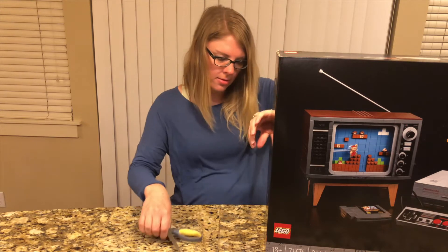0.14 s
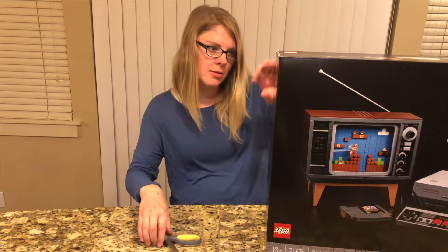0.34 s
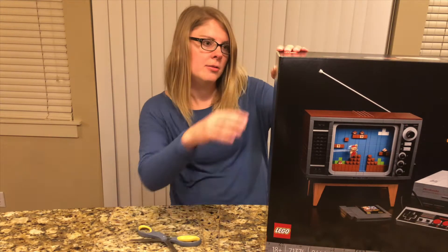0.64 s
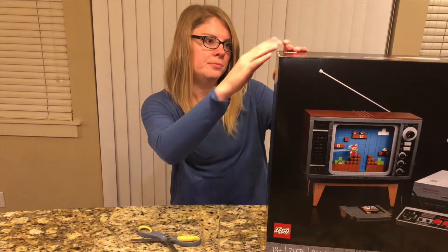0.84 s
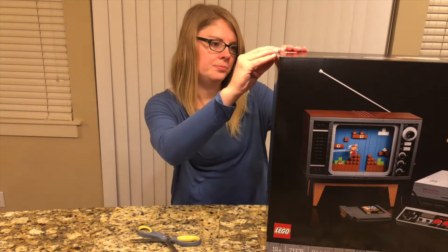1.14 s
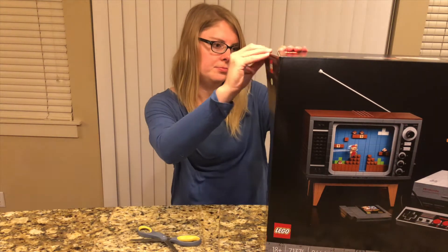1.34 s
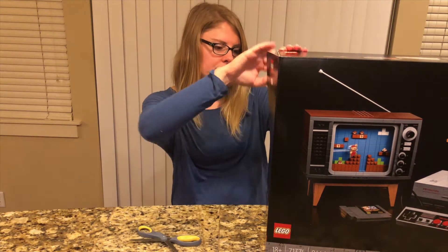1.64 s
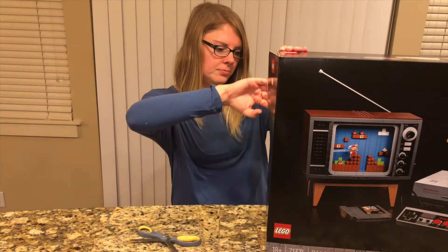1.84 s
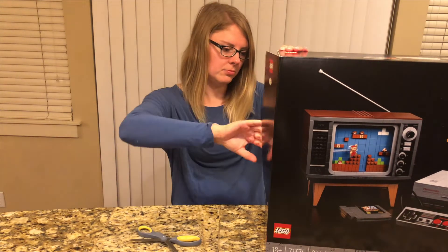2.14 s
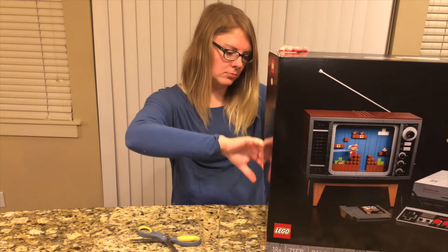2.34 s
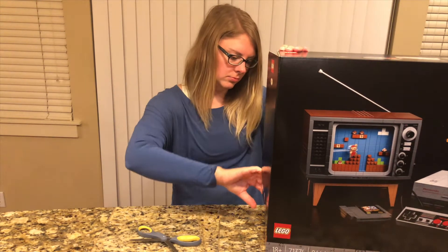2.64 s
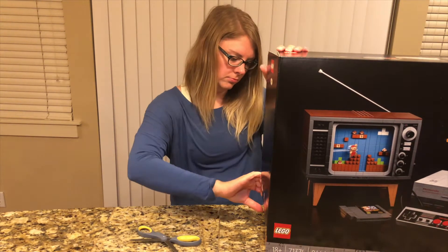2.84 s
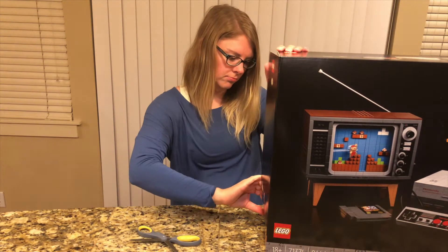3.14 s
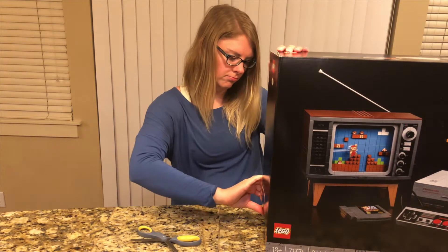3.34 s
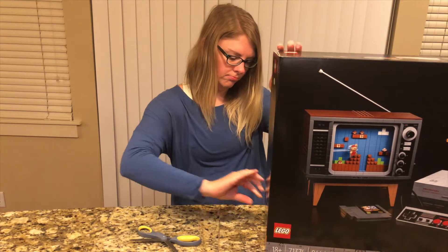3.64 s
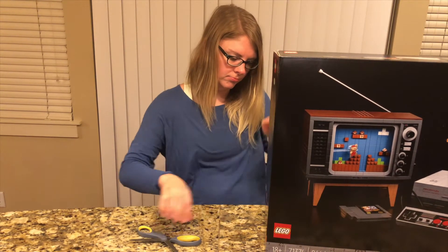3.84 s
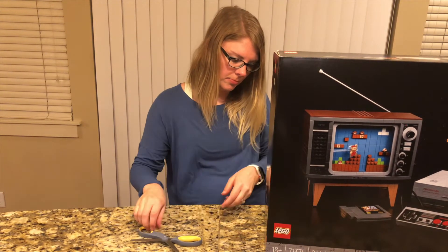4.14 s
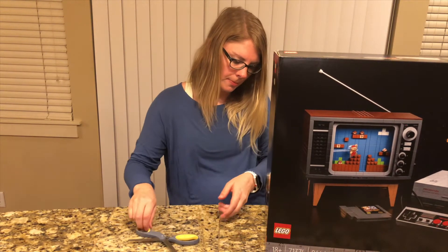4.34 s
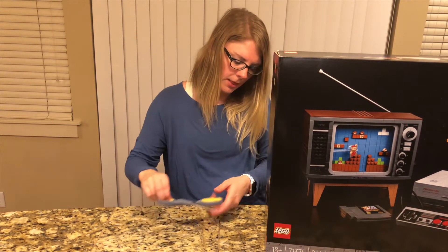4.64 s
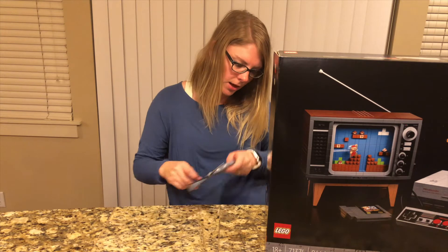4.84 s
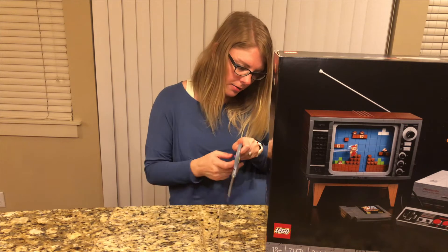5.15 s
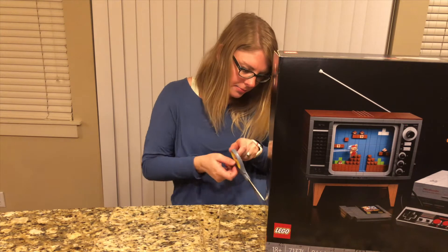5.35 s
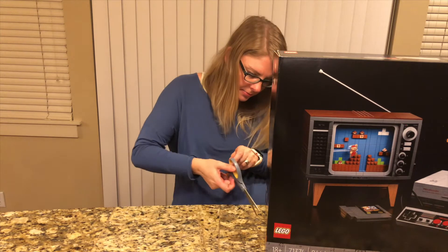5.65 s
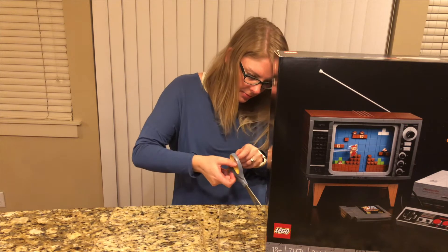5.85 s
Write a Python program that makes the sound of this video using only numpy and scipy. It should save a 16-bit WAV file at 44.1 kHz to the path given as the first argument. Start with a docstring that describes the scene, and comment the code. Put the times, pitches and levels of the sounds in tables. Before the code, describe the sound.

A low, slightly unsteady appliance hum with soft fan noise runs throughout a small, mildly reverberant kitchen. At 0.15 s scissors touch a stone counter, then clatter in a dense cluster from 0.24 to 0.4 s, hard clicks with ringing plastic handles and bright blades. Faint scuffs follow until 1 s. At 1.26 s the stiff edge of a big cardboard box pops; fainter flicks come around 1.45 s with a fingertip rub, and the loudest, boomy pop hits at 1.9 s. A palm hisses down the side from 2.15 to 2.6 s. Between 2.7 and 3.45 s tape lets go in small dry ticks and crackles. A short brush and soft thud come at 3.5 to 3.6 s. A gritty scrape of scissors on stone swells toward 4 s, with handle rattles and clicks from 4.05 to 4.4 s. A barely audible click at 4.77 s leaves just the hum.

```python
"""Scissors and a taped box

Scissors clatter onto a stone kitchen counter: damped noise bands plus ringing handles and blades.
A hand pops the edge of a big cardboard box, twice loudly and a few times faintly, slides down its side
(shaped noise) and picks at crackling tape, then drags the scissors off the counter and clicks them.
An appliance hums throughout (motor tones and fan noise); a diffuse room tail answers every other sound."""
import sys
import numpy as np
from scipy import signal
from scipy.fft import rfft, irfft, next_fast_len
from scipy.io import wavfile
from scipy.ndimage import map_coordinates

SR = 44100
rng = np.random.default_rng(int(sys.argv[2]) if len(sys.argv) > 2 else 0)


def wav_record(signal):
    """Record a signal, one row per channel, as 16-bit PCM in the file named by sys.argv[1]."""
    frames = np.transpose(np.atleast_2d(signal))
    bounded = np.clip(frames, -1, 1)
    # unit amplitude maps onto the largest positive 16-bit level
    quanta = np.round(bounded * 32767).astype(np.int16)
    wavfile.write(sys.argv[1], SR, quanta)


N = 264159
TIME = np.arange(N) / SR
AGE = TIME[:SR // 2]  # time since a blow, s

# plastic scissor handles, ringing modes: mode_hz, relative_level_db, t60_s
HANDLES = [(556, -9, .25), (689, 0, .24), (727, -8, .12), (845, -9, .15), (961, -6, .2), (1130, -7, .2),
           (1250, -3, .1), (1410, -4, .1), (1502, -4, .2), (1633, -3, .2), (2340, -6, .1)]


def amp(db):
    """Decibels to gain."""
    return 10 ** (np.asarray(db) / 20)


def unit(x):
    """Scale to rms 1."""
    return x / np.sqrt(np.mean(x ** 2) + 1e-20)


def blow(x):
    """Scale to the energy of 10 ms at rms 1."""
    return x * np.sqrt(SR / 100 / (np.sum(x ** 2) + 1e-20))


def along(points, hz):
    """(Hz, value) points read on a log frequency axis."""
    f, v = np.transpose(points)
    return np.interp(np.log(hz + 1), np.log(f + 1), v)


def wobble(knots_per_s):
    """A smooth random curve through normally distributed knots."""
    knots = rng.standard_normal(int(N * knots_per_s / SR) + 4)
    return map_coordinates(knots, [TIME * knots_per_s])


def filtered(x, gain):
    """x with a gain that depends on frequency."""
    m = next_fast_len(len(x) + 8192)
    spectrum = rfft(x, m) * gain(np.fft.rfftfreq(m, 1 / SR))
    return irfft(spectrum, m)[:len(x)]


def noise(colour, grain_db=0):
    """Coloured noise of rms 1; grain clumps it into tiny catches."""
    source = rng.standard_normal(N) * amp(grain_db * wobble(900))
    return unit(filtered(source, lambda hz: amp(along(colour, hz))))


def stroke(start_s, rise_s, length_s, level_db, sag_db_per_s, release_db_per_s):
    """Gain of a rub: it swells, sags as pressure eases, then fades faster after its length."""
    t = np.maximum(TIME - start_s, 0)
    swell = np.sin(np.pi / 2 * np.minimum(t / rise_s, 1)) ** 2
    release_db = release_db_per_s * np.maximum(t - length_s, 0)
    return swell * amp(level_db - sag_db_per_s * t - release_db)


def add(track, start_s, sound):
    """Mix a sound into the track."""
    part = track[round(start_s * SR):][:len(sound)]
    part += sound[:len(part)]


def flurry(spans, rate_per_s, scatter_db):
    """(start_s, level_db) of small contacts that come unevenly during each span."""
    contacts = []
    for span_s, length_s, level_db in spans:
        late, strength = rng.random(20), rng.standard_normal(20)
        after_s = (np.arange(20) + late / 2) / rate_per_s
        for s, k in zip(after_s, strength):
            if s < length_s:
                contacts.append((span_s + s, level_db + scatter_db * k))
    return contacts


def crack(material, tilt_db_per_octave):
    """Damped noise bands of a material. Row 0: direct sound; row 1: even average that feeds the room."""
    t = AGE[:SR // 6]
    white = rfft(rng.standard_normal(len(t)))
    f = np.fft.rfftfreq(len(t), 1 / SR)
    centres_hz = [row[0] for row in material]
    out = np.zeros((2, len(t)))
    for share, (hz, level_db, t60_s) in zip(np.eye(len(material)), material):
        # power response: crossfades between neighbours, rolls off below the lowest band
        window = along(np.c_[centres_hz, share], f) * np.minimum(f / centres_hz[0], 1) ** 2
        band = irfft(white * np.sqrt(window), len(t))
        band *= amp(-60 * t / t60_s) * (1 - np.exp(-t * hz / 2.7))  # low bands start later
        even = np.roll(irfft(window, len(t)), SR // 400)
        even *= t < t[-1] / 2
        tilt_db = tilt_db_per_octave * np.log2(max(hz, 700) / 2000)
        out += amp(level_db + tilt_db) * np.array([blow(band), amp(1.0) * blow(even)])
    return np.pad(out, ((0, 0), (0, len(AGE) - len(t))))


def ring(modes):
    """Decaying sine modes, struck at new strengths and phases every time."""
    hz, level_db, t60_s = np.transpose(modes)[:, :, None]
    strength, phase = rng.standard_normal((2, len(modes), 1))
    decay = amp(level_db + 2 * strength - 60 * AGE / t60_s)
    waves = decay * np.sin(2 * np.pi * (hz * AGE + phase))
    return blow(np.sum(waves * (1 - np.exp(-AGE * hz)), axis=0))


def thud(hz):
    """A soft low push with hardly any ring: direct sound, and the weaker share that stirs the room."""
    push = blow(np.sin(2 * np.pi * hz * AGE) * AGE * np.exp(-AGE * hz / 0.95))
    return np.array([push, amp(-3.5) * push])


def in_room(x):
    """A sound plus its diffuse tail: noise that builds up, then decays fastest in the top treble."""
    # room tail: band_hz, t60_s, level_db
    room = np.array([(103.3, .5, -3.5), (403, 0.58, 0.5), (1500, 0.65, -3.5), (4900, 0.69, -4.5),
                     (9060, 0.46, -6.5), (15200, 0.32, -10)])
    direct, radiated = np.broadcast_to(x, (2, x.shape[-1]))
    hz, t, z = signal.stft(rng.standard_normal(SR * 3 // 4), SR, nperseg=256)
    t60_s = along(room[:, :2], hz)[:, None]
    level_db = along(room[:, ::2], hz)[:, None]
    decay = amp(level_db - 60 * t / t60_s) * np.sqrt(np.log(1e6) / (t60_s * SR))
    tail = signal.istft(z * decay, SR, nperseg=256)[1]
    build_up = 1 - np.exp(-(TIME[:len(tail)] / 0.0026) ** 2)
    out = signal.fftconvolve(radiated, tail * build_up)
    add(out, 0, direct)
    return out


def appliance():
    """Motor tones, slightly unsteady in level and phase, over the rush of a fan."""
    # motor tones: tone_hz, rms_level_db, unsteadiness_db
    hum = [(59.4, -60.5, 1), (99.5, -60, 1.5), (199.3, -47, .6), (248, -68, 3), (316, -67.5, 3),
           (357, -68, 3), (415, -65, 3), (597, -77, 2), (1723, -82, 1.5)]
    # fan noise colour: frequency_hz, relative_level_db_per_hz
    air = [(20, -28.5), (55, -9.5), (80, -9), (130, -6.5), (200, 1.5), (280, -0.5), (400, -1), (500, -10.5),
           (800, -14.5), (1500, -21.5), (3000, -28), (8000, -31.5), (16000, -39.5)]
    tones = np.zeros(N)
    for hz, rms_db, sway_db in hum:
        level = amp(rms_db + sway_db * wobble(4.0))
        tones += level * np.sin(2 * np.pi * hz * TIME + 0.31 * sway_db * wobble(7))
    return np.sqrt(2) * tones + amp(-54.0) * noise(air)


def scissors():
    """Contacts click on stone, clack at the struck spot, ring handles and blades; jolts rattle the halves."""
    # strikes on the stone, or closing (level before trim):
    # start_s, level_db, tilt_db_per_octave, clack_hz, handle_ring_db, blade_ring_db
    strikes = [(.1527, -43, 3.5, 1650, -0.5, -7), (.2424, -29.5, 1, 1480, -4, -15),
               (.2681, -24, 3, 1200, -1.5, -24), (.3, -31.5, 7.5, 4800, 3.5, 3),
               (.3095, -26, -4, 850, 4, 3), (.3158, -34, 8, 3730, -21, 9),
               (.3638, -28.5, -3, 1485, -2, -12), (.368, -27.5, 4.5, 2170, -2, -13),
               (.3795, -29.5, -5, 720, -2, -1.5), (0.383, -30, 2.5, 1093, -2.5, -4),
               (0.9168, -66.5, 7, 3600, -18, -17.5), (4.051, -45.5, 1, 2370, 3, -11),
               (4.0655, -38, -1, 2060, 6.5, -17), (4.0805, -39, -1.5, 2400, 2.5, -16),
               (4.1863, -41, -8.5, 2030, 5, -32), (4.3511, -44.5, -6, 2360, -5, -26),
               (4.4036, -48.5, 7.5, 8200, 2, 6.5), (4.7732, -68, 2, 4110, -14, -13)]
    # loose halves rattling after a jolt: start_s, length_s, level_db (before trim)
    rattles = [(.311, .009, -29), (.388, .009, -33.5), (4.043, .072, -44), (4.19, .02, -51)]
    # click of steel on stone: band_hz, relative_level_db, t60_s
    steel_on_stone = [(182, -14, 0.051), (465, -20, 0.18), (645, -12.5, 0.051), (1030, -13.5, 0.024),
                      (1490, -5, 0.071), (3135, -3, 0.032), (6300, -4, 0.022), (13070, -7, .011)]
    # blade modes: mode_hz, relative_level_db, t60_s
    blades = [(2130, -6, .06), (2430, 0, .08), (3730, -8, .08), (4580, -5, .07), (4730, -3, .08),
              (6480, -2, .1), (7540, -7, .06), (8150, 0, .1), (8870, 0, .1), (9570, -6, .08),
              (11000, -4, .05), (11900, -1, .05)]
    rattle_hz, rattle_spread_octaves = 1350, 0.387
    rattle_tilt_db_per_octave, rattle_handle_db, rattle_blade_db = -6, -1, -19.5
    trim_db = -5.0
    contacts = list(strikes)
    for s, level_db in flurry(rattles, rate_per_s=105, scatter_db=0.5):
        clack_hz = rattle_hz * 2 ** (rattle_spread_octaves * rng.normal())
        contacts.append((s, level_db, rattle_tilt_db_per_octave, clack_hz,
                         rattle_handle_db, rattle_blade_db))
    out = np.zeros(N)
    for s, level_db, tilt_db_per_octave, clack_hz, handle_db, blade_db in contacts:
        click = crack(steel_on_stone, tilt_db_per_octave)
        clack = amp(1.5) * ring([(clack_hz, 0, 30 / clack_hz)])
        ringing = amp(handle_db) * ring(HANDLES) + amp(blade_db) * ring(blades)
        add(out, s, in_room(amp(level_db + trim_db) * (click + clack + ringing)))
    return out


def box():
    """The stiff edge snaps and booms the big side panel; soft low thuds come alone or under a pop."""
    # edge snapping under the fingers, two loud and four faint (level and boom before trim):
    # start_s, level_db, tilt_db_per_octave, boom_db
    pops = [(1.2591, -29, 1.5, -13), (1.4306, -49.5, -3, -9.5), (1.464, -49.5, -4.5, 3),
            (1.4834, -48, 0.5, -4), (1.9148, -20, 1.03, -4.5), (3.5101, -51, -2.5, 0)]
    # soft low thuds, alone or under another sound: start_s, level_db, pitch_hz
    thuds = [(0.309, -43, 112.3), (0.459, -44.5, 68), (1.26, -34, 215), (1.468, -42.5, 250),
             (1.544, -41.5, 64), (1.932, -38, 74.5), (2.979, -46, 282), (3.512, -43, 290),
             (3.616, -38.5, 107)]
    # cardboard snap: band_hz, relative_level_db, t60_s
    card = [(106.6, -31, .1), (206.5, 0, 0.24), (420, -3.5, 0.02), (904, -3, 0.018), (1500, -1, 0.021),
            (2930, -6, 0.064), (6000, -9, 0.018), (10000, -7.5, 0.015), (13800, -7.5, .007)]
    # side panel modes: mode_hz, relative_level_db, t60_s
    panel = [(124, 1, .31), (139, -4, .2), (172, -5, .12), (205, -4, .12), (248, -5, .2), (364, -3, .15),
             (588, -7, .12), (661, -3, .13), (1225, -7, .08), (1365, -8, .08), (1560, -10, .08)]
    trim_db, boom_trim_db = -2.5, 6.5
    out = np.zeros(N)
    for s, level_db, tilt_db_per_octave, boom_db in pops:
        snap = crack(card, tilt_db_per_octave)
        boom = amp(boom_db + boom_trim_db) * ring(panel)
        add(out, s, in_room(amp(level_db + trim_db) * (snap + boom)))
    for s, level_db, hz in thuds:
        add(out, s, in_room(amp(level_db) * thud(hz)))
    return out


def rubbing():
    """Skin and cloth hiss on the box; scissors scuff and scrape on stone, so their handles sing."""
    # handles scuffing as the fingers let go: start_s, peak_gain_db
    scuffs = [(0.565, -40), (.593, -41), (.715, -45.5), (.855, -50), (.978, -53)]
    # strokes along the box: start_s, rise_s, length_s, level_db (before trim), what_rubs
    slides = [(1.02, 0.019, 0.24, -61, "sleeve"), (1.427, .02, 0.066, -55.5, "fingertips"),
              (1.473, 0.18, 0.27, -44.5, "fingertips"), (1.816, 0.024, 0.081, -52, "fingertips"),
              (2.149, 0.12, 0.38, -48.5, "palm"), (2.574, 0.048, 0.056, -51, "palm"),
              (3.529, 0.036, 0.073, -44.5, "brush-off"), (3.57, 0.019, 0.026, -54, "fingertips")]
    # scissors dragged on stone: start_s, rise_s, length_s, level_db (before scrape gain)
    drag = (3.5, 0.8, 0.45, -46)
    # noise colours of scuff, drag and strokes: frequency_hz, relative_level_db_per_hz
    plastic = [(300, 0), (650, 4), (1200, 1), (1700, -5), (2500, -8.5), (3300, -15), (7000, -25),
               (15000, -39)]
    grit = [(300, -25), (480, 1), (690, 7), (900, -3), (1450, -11), (2400, -27), (3200, -10), (5000, -23),
            (15000, -49)]
    sleeve = [(400, 13), (1200, 3), (4000, -5), (9000, -12.5), (16000, -21)]
    fingertips = [(290, -31), (500, -6), (631, -2), (1440, -5), (2980, -6), (5390, -10.5), (9090, -9.5),
                  (16000, -13)]
    palm = [(290, -38), (500, 0), (1080, -4), (1550, -1), (2330, -4), (3700, -5), (15100, -10.5),
            (16000, -18.5)]
    brush_off = [(240, 1.5), (450, 1.5), (900, -10), (1500, -5.5), (2100, -9), (2750, -11), (3400, -13),
                 (8000, -21), (16000, -30)]
    colours = {"sleeve": sleeve, "fingertips": fingertips, "palm": palm, "brush-off": brush_off}
    scuff_rise_s, slide_trim_db = 0.0066, 2.5

    pressure = amp(slide_trim_db + 1.0 * wobble(35.23))
    hands = np.zeros(N)
    for *shape, part in slides:
        gain = stroke(*shape, sag_db_per_s=26.5, release_db_per_s=182.5)
        hands += gain * noise(colours[part], grain_db=2)
    hands *= pressure

    # handles catch and slip unevenly, and ring on after each catch
    uneven = unit(noise(grit, grain_db=8.7) * amp(3.4 * wobble(70)))
    catches = stroke(*drag, sag_db_per_s=24, release_db_per_s=260) * uneven
    handles = ring(HANDLES) * amp(-60 * AGE / 0.2)  # damped by the hand
    singing = signal.fftconvolve(catches, handles / np.linalg.norm(handles))[:N]
    scrape = amp(-2) * catches + amp(-14) * singing

    touches, u = np.zeros(N), AGE / scuff_rise_s
    for s, peak_db in scuffs:
        add(touches, s, amp(peak_db) * u * np.exp(1 - u))
    scuffing = touches * noise(plastic, grain_db=4.5)
    return in_room(hands + scrape + scuffing)[:N]


def tape():
    """Jerks of the tape tick, the harder the brighter; sustained pulls crackle and flex the cardboard."""
    # tape letting go in jerks: start_s, level_db (before trim)
    jerks = [(2.704, -56), (2.729, -51), (2.782, -48), (2.8315, -45), (2.958, -43.5), (2.9783, -46),
             (3.0015, -48.5), (3.092, -56.5), (3.13, -55), (3.1874, -49.5), (3.227, -51.5), (3.2521, -49.5),
             (3.456, -58)]
    # sustained pulls: start_s, length_s, tick_level_db
    pulls = [(2.93, .08, -62.5), (3.2, .09, -59), (3.395, .035, -60.5)]
    # tape tick: band_hz, relative_level_db, t60_s
    film = [(151, -4, 0.11), (327, -1, 0.047), (630, -0.5, 0.046), (930, -4.5, 0.012), (1600, -0.5, 0.028),
            (3590, -6.5, 0.024), (6600, -8, 0.036), (12700, -4, 0.031)]
    even_db, tilt_per_db = -42.5, 0.13  # untilted jerk level; dB per octave gained per dB of strength
    trim_db = -2.0
    flex_hz, flex_db = 250, 9.5  # box wall gives with each tick of a pull
    out = np.zeros(N)
    for s, level_db in jerks:
        tick = crack(film, tilt_per_db * (level_db - even_db))
        add(out, s, in_room(amp(level_db + trim_db) * tick))
    for s, level_db in flurry(pulls, rate_per_s=42, scatter_db=-1):
        tick = crack(film, tilt_db_per_octave=-2.5)
        flex = amp(flex_db) * thud(flex_hz)
        add(out, s, in_room(amp(level_db) * (tick + flex)))
    return out


def scene():
    """All sources at one microphone."""
    return (appliance() + scissors() + box() + rubbing() + tape())[None]


def record(dry):
    """Steep low-pass: almost nothing remains above the band limit."""
    top_hz = 16000
    return np.array([filtered(x, lambda hz: 1 / (1 + (hz / top_hz) ** 120)) for x in dry])


dry = scene()
out = record(dry)
wav_record(out)
```